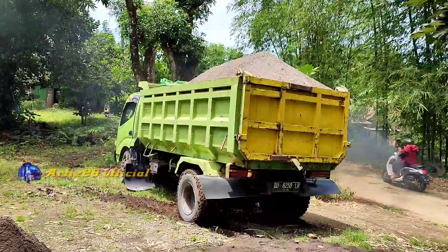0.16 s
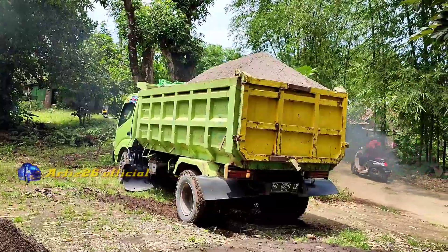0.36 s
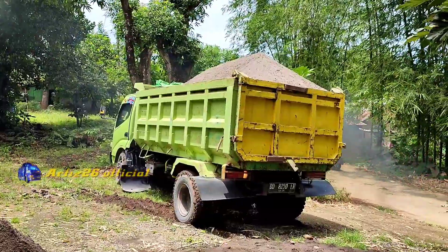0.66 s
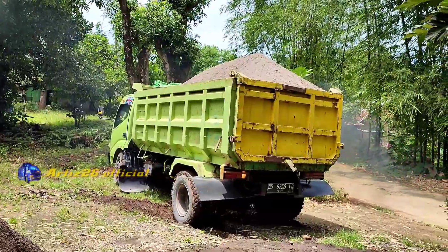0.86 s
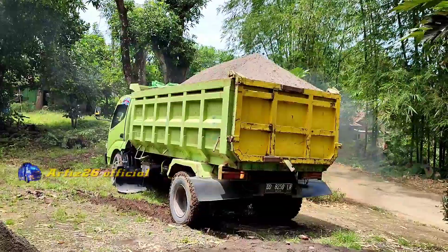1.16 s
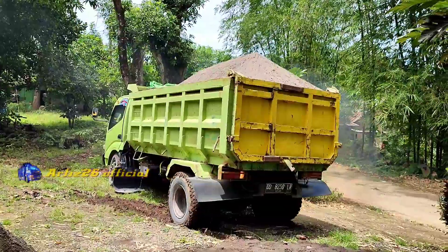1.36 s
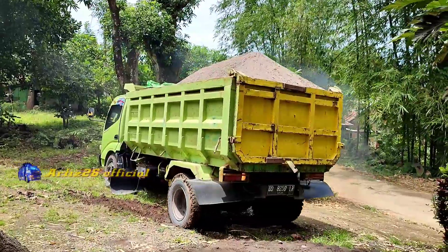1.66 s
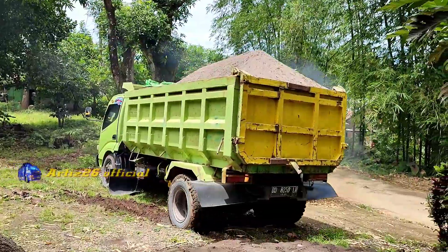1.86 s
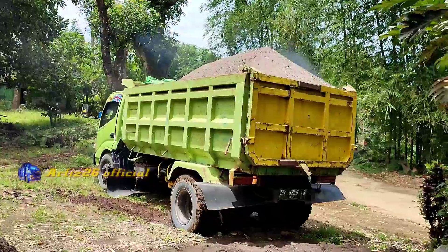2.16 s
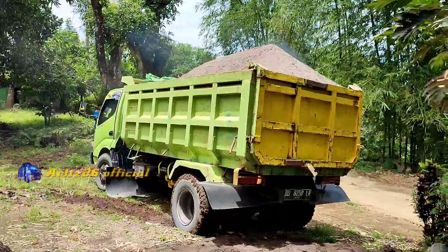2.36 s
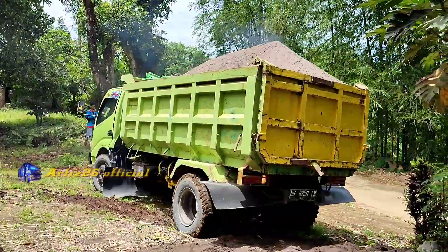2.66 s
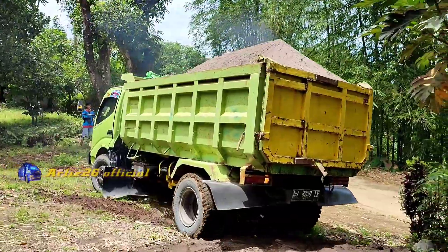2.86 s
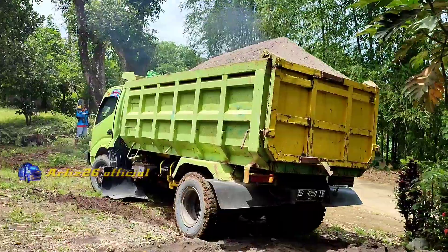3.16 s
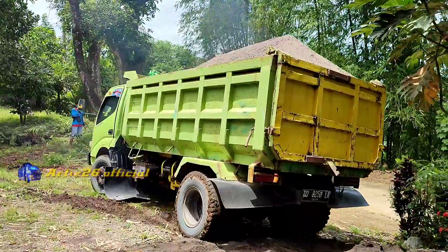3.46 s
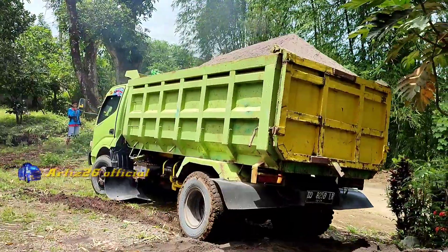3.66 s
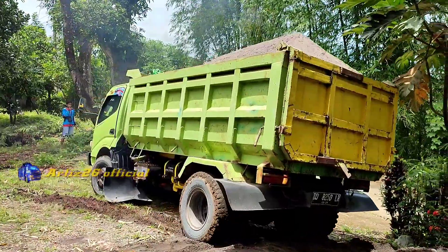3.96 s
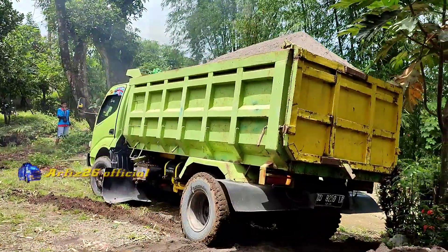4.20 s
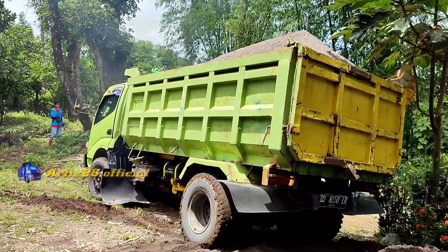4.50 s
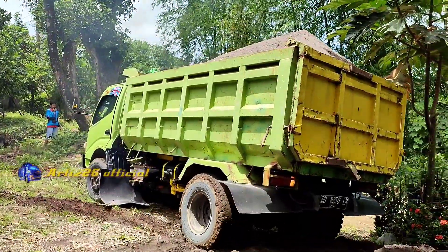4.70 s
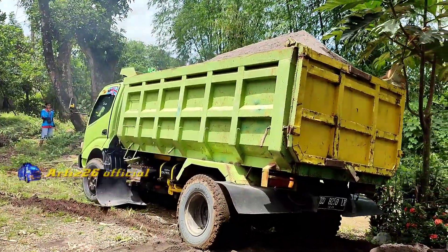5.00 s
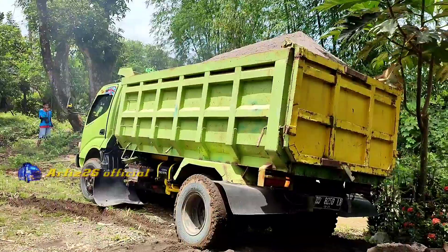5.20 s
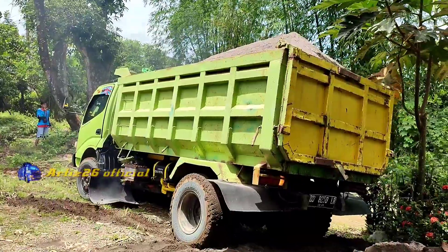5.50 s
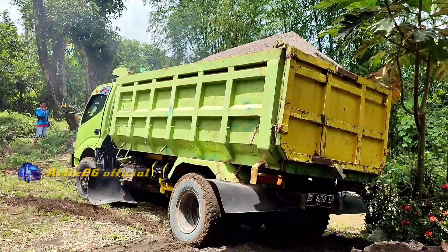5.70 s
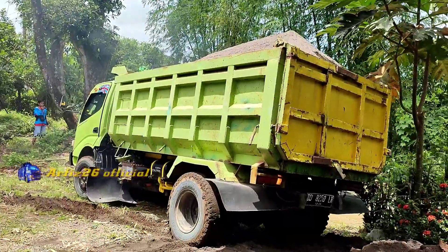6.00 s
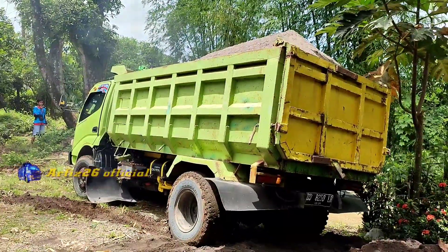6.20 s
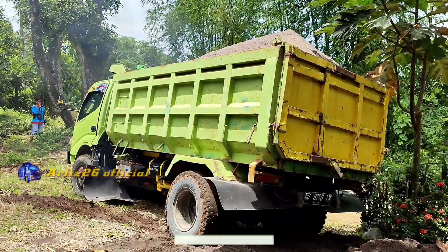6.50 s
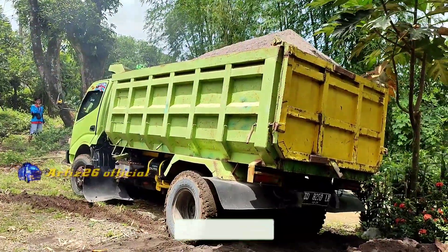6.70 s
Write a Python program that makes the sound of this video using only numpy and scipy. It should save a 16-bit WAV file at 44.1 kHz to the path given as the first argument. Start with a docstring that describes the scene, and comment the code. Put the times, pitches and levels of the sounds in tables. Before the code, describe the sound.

Deep diesel exhaust thumps, revs into a rasping, hissing roar with a faint gliding whistle, sags, pulls again, and settles into lumpy, clattering idle.

```python
"""Thumping exhaust of a loaded four-cylinder diesel dump truck, stuck in soft ground; it sinks briefly,
revs in bursts, then settles to idle. One train of firings drives it all: each rings the exhaust pipe,
knocks the block and pushes out a puff of rasping, hissing gas.
Gas flow under load whistles in the tailpipe: narrow noise bands that glide in pitch.
Stereo: noise alike in the bass and unrelated in the treble, the right side slightly ahead."""
import sys
import numpy as np
from scipy import signal
from scipy.fft import rfft, irfft, next_fast_len
from scipy.io import wavfile
from scipy.ndimage import uniform_filter1d, map_coordinates

SR = 44100
rng = np.random.default_rng(int(sys.argv[2]) if len(sys.argv) > 2 else 0)


def unload_audio(sound):
    """Save the sound as a 16-bit wav file, at the path given as the first command line argument."""
    columns = np.transpose(np.atleast_2d(sound))
    # keep every value between -1 and 1, then stretch to whole-number steps
    steps = np.round(np.clip(columns, -1, 1) * 32767)
    wavfile.write(sys.argv[1], SR, steps.astype(np.int16))


N = 302085

# engine speed: time_s [s], firing_rate_hz [firings/s]
SPEED = [(0.0, 34.29), (0.339, 32.61), (0.45, 35.64), (0.654, 53.78), (0.924, 53.65), (1.08, 60.37),
         (1.288, 65.03), (1.684, 55.08), (2.15, 54.51), (2.279, 49.46), (2.429, 38.37), (2.587, 35.62),
         (2.948, 39.56), (3.581, 41.92), (3.854, 35.39), (4.096, 31.96), (4.393, 30.83), (4.709, 32.33),
         (4.947, 36.75), (5.193, 28.35), (5.487, 22.28), (6.05, 21.07)]
# exhaust pulse spectra, hotter gas lifts the resonances: freq_hz [Hz], relative_level_db [dB]
PIPE_IDLE = [(12, -24), (22, 5), (42, 10), (63, 1.5), (85, 9.5), (108, 7.5), (130, -1.5), (165, -17),
             (240, -31.5), (400, -33), (800, -67)]
PIPE_LUG = [(15, -13), (36, -5), (62, -5), (86, 2), (115, -1), (140, -7.5), (175, 3), (202, -1),
            (250, -17.5), (300, -22), (370, -21), (480, -50), (1000, -52), (1600, -71)]
PIPE_RACE = [(20, -41), (55, -4), (95, -5), (132, -1.5), (165, 1.5), (198, 6), (225, -1.5), (272, -14.5),
             (335, -13.5), (400, -18.5), (490, -32.5), (700, -26.5), (1050, -49.5), (1700, -61)]
# speeds of the pipe states: idle_hz, lug_from_hz, lug_to_hz, race_hz [firings/s]
PIPE_SPEEDS_HZ = [23.493, 32.3, 40.5, 56.4]
# unequal firing strength, one entry per cylinder: strength_db [dB]
CYLINDERS_DB = [0.018, -0.23, 0.023, 0.11]
# noise spectra: freq_hz [Hz], relative_density_db [dB per Hz]
RASP = [(300, -12), (450, -3), (530, -4.5), (600, -2.5), (700, 2), (950, 3), (1150, -10), (1800, -12.5),
        (4000, -56)]
CLATTER = [(300, -13), (700, -8.5), (1200, -1.5), (1700, 1), (2300, 1), (2850, -3), (3500, -7.5),
           (4300, -16), (6000, -14), (10000, -21.5)]
HISS = [(1200, -15), (2800, -2.5), (4000, 4.5), (4700, 0.5), (5700, -2), (7200, -1.5), (8200, -7.5),
        (9000, -10.5), (9900, -16), (12500, -17.5), (14300, -23)]
BLARE = [(180, -21.5), (255, -6.5), (320, 0), (385, 0), (460, -12.5), (560, -14.5), (900, -56)]
RUMBLE = [(15, -35), (35, -26), (90, 8), (200, 4.5), (260, -3.5), (500, -76)]
# left-right likeness of the noise: freq_hz [Hz], correlation [-1 to 1]
ALIKE = [(150, 1), (350, 0.91), (600, 0.48), (1000, 0.42), (2000, 0.19), (5000, 0.11), (12000, -0.043)]
# stereo balance: freq_hz [Hz], left_minus_right_db [dB]
BALANCE = [(100, 0.52), (430, 0.2), (650, -2), (1000, 0), (1350, -3.5), (2400, -2), (2900, -1), (4100, -5),
           (5800, -2), (7000, -2.5), (7900, -6.5), (8600, 6.5), (9600, -1.5), (14000, .3)]
# engine block resonances: freq_hz [Hz], width_hz [Hz], lift_db [dB]
BLOCK = [(704, 70, 10.5), (990, 90, 1), (1238, 33, 4), (1498, 54, 6.5), (1940, 51, 5.5), (2127, 49, 6.5),
         (2353, 61, 4), (2850, 25, 6.5)]
# engine load: time_s [s], load_db [dB re full load]
LOAD = [(0.05, -11), (0.24, -14.5), (0.49, -7), (0.57, 2.5), (0.68, 0.5), (0.98, -2.5), (1.43, -0.5),
        (1.57, 2), (2.17, 0), (2.43, -7.5), (2.62, -3.5), (3.25, -0.5), (3.5, 1.5), (3.8, -5), (4.2, -10),
        (4.76, -8.5), (4.94, -3.5), (5.04, -10), (5.36, -17.5), (6.85, -16)]
# tailpipe gas flow: time_s [s], flow_db [dB re full flow]
FLOW = [(0.0, -1.5), (0.05, -8.5), (0.14, -17.5), (0.47, -15), (0.58, -5.5), (0.93, -12), (1.14, -2.5),
        (1.5, -0.5), (2.13, -1.5), (2.48, -11.5), (2.82, -5), (3.1, -6), (3.56, -2), (3.78, -11.5),
        (4.4, -7.5), (4.94, -3), (5.09, -14), (5.35, -19.5), (6.85, -21)]
# driver lifts off the pedal: start_s [s], end_s [s], stumble_db [dB of load lost as fuel is cut]
LIFTS = [(0.12, 0.453, -1.5), (0.694, 0.81, 6), (0.849, 0.968, 8), (2.19, 2.55, 0.5), (4.994, 5.42, 3)]
# how each part follows the engine: full_db [dB at full load, flow and speed], per_load [dB/dB],
# per_flow [dB/dB], per_octave_db [dB per doubling of speed], lifted_db [dB with the pedal lifted]
THUMP_LAW = (-14.5, 1, 0, 0, -3.5)
BARK_LAW = (-10, 0.93, 0.87, 8.5, -14)
BLARE_LAW = (-31.5, .5, 0.51, 3.5, -3)
RASP_LAW = (-36, 0.33, 0.46, 2, -.5)
CLATTER_LAW = (-35, 0.09, 0.33, 2.04, 0.5)
HISS_LAW = (-32.5, 0, 1, 0, -.5)
# labouring at high speed, the blare hardens: start_s [s], end_s [s], swell_s [s], lift_db [dB]
LABOUR = (1.69, 2.23, 0.18, 5.4)
# tailpipe whistles, one per pull: start_s [s], attack_s [s], fade_s [s, fade begins], end_s [s],
# level_db [dB], first_hz [Hz], settled_hz [Hz], glide_s [s, time constant]
WHISTLES = [(0.47, 0.11, 0.55, 0.9, -34, 3090, 3300, .25), (0.94, 0.27, 1.54, 2.44, -28, 3020, 3793, .28),
            (2.5, 0.13, 3.603, 3.88, -29, 3183, 3470, .75),
            (3.78, 0.21, 4.68, 5.15, -29.5, 3380, 3182, .28)]

TOP_HZ = 14300
LEFT_LAG_S = .00008
FULL_SPEED_HZ = 51.4  # firings/s
PEDAL_S, STUMBLE_DELAY_S, STUMBLE_S = 0.038, 0.014, 0.015  # pedal travel; stumble delay, half length
BARK_TOP_DB, BARK_TOP_DB_PER_OCTAVE = -17.5, 8  # bark cap at top of lugging; its rise per speed doubling
HUNT_DB, HUNT_LIFTED_DB, HUNT_KNOTS_HZ = .4, 1.3, 22  # random swell; extra with pedal lifted; rate
CLEAR_LUG, CLEAR_RACE, CLEAR_LABOUR = 0.22, 0.43, .42  # tonal power share of blare; last is added


def amp(db):
    """Decibels to gain."""
    return 10 ** (np.asarray(db) / 20)


def unit(x):
    """Scale to rms 1."""
    return x / np.sqrt(np.mean(x ** 2) + 1e-20)


def along(points, hz):
    """Read (Hz, value) points on a log frequency axis."""
    f, v = np.transpose(points)
    return np.interp(np.log(hz + 1), np.log(f + 1), v)


def curve(rows):
    """Interpolate (s, value) rows to one value per sample."""
    s, v = np.transpose(rows)
    return np.interp(np.arange(N) / SR, s, v)


def wobble(knots_hz):
    """A smooth random curve through knots at a given rate."""
    knots = rng.standard_normal(int(N * knots_hz / SR) + 4)
    return map_coordinates(knots, [np.arange(N) * knots_hz / SR])


def filtered(x, response):
    """Multiply the spectrum of x by a response of frequency."""
    m = next_fast_len(N + SR // 2)
    return irfft(rfft(x, m) * response(np.fft.rfftfreq(m, 1 / SR)), m)[..., :N]


def below(x, edge_hz, order=24):
    """The part of x under an edge."""
    return filtered(x, lambda hz: 1 / (1 + (hz / edge_hz) ** order))


def steady(x, size=4096):
    """Hold the slow level of x at rms 1."""
    power = uniform_filter1d(uniform_filter1d(x ** 2, size), size)
    return x / np.sqrt(np.abs(power) + 1e-20)


def ringing(spectrum, size=16384):
    """Minimum-phase impulse response of a spectrum, by folding its cepstrum."""
    log_gain = np.log(amp(along(spectrum, np.fft.rfftfreq(size, 1 / SR))))
    cepstrum = irfft(log_gain)
    cepstrum[1:size // 2] *= 2
    cepstrum[size // 2 + 1:] = 0
    return irfft(np.exp(rfft(cepstrum)))[:size // 2]


def rush(spectrum, modes=()):
    """Turbulent stereo noise, mid at rms 1; the mid-side split sets its left-right correlation."""
    def colour(hz):
        lift_db = sum(db / (1 + (2 * (hz - f) / width_hz) ** 2) for f, width_hz, db in modes)
        return amp(along(spectrum, hz) + lift_db)

    def mid_side(hz):
        angle = np.arccos(np.clip(along(ALIKE, hz), -1, 1)) / 2
        return colour(hz) * [np.cos(angle), np.sin(angle)]

    mid, side = filtered(rng.standard_normal((2, N)), mid_side)
    return np.array([mid + side, mid - side]) / np.std(mid)


def held(start_s, end_s, ramp_s):
    """1 between two times, 0 outside, with a ramp centred on each edge."""
    t = np.arange(N) / SR
    return np.clip(np.minimum(t - start_s, end_s - t) / ramp_s + .5, 0, 1)


def lifted():
    """1 while the pedal is lifted, 0 while it is pressed."""
    return sum(held(start_s, end_s, PEDAL_S) for start_s, end_s, _ in LIFTS)


def hunting():
    """Random swell and sag of the pulses in dB, most with the pedal lifted."""
    return (HUNT_DB + HUNT_LIFTED_DB * lifted()) * wobble(HUNT_KNOTS_HZ)


def level(law):
    """Level in dB of one part of the sound, from load, gas flow, speed and pedal."""
    full_db, per_load, per_flow, per_octave_db, lifted_db = law
    t = np.arange(N) / SR
    stumble_db = 0
    for start_s, _, db in LIFTS:
        stumble_db = stumble_db + db * np.exp(-((t - start_s - STUMBLE_DELAY_S) / STUMBLE_S) ** 2)
    load_db = per_load * (curve(LOAD) - stumble_db)
    flow_db = per_flow * curve(FLOW)
    speed_db = per_octave_db * np.log2(curve(SPEED) / FULL_SPEED_HZ)
    return full_db + load_db + flow_db + speed_db + lifted_db * lifted()


def firings(speed_hz, jitter_s, scatter_db):
    """One impulse per firing, its size set by the cylinder and by chance, its time jittered."""
    at = np.flatnonzero(np.diff(np.floor(np.cumsum(speed_hz) / SR + .75)))
    size_chance, time_chance = rng.standard_normal((len(at), 2)).T
    size_db = np.resize(CYLINDERS_DB, len(at)) + scatter_db * size_chance
    at = np.clip(at + np.round(jitter_s * SR * time_chance).astype(int), 0, N - 1)
    return np.bincount(at, amp(size_db), N)


def puffs(fire, delay_s, rise_s, fall_s, share, scatter_db):
    """Envelope near rms 1: a power share swells after each firing, the rest is steady."""
    t = np.maximum(np.arange(SR // 8) / SR - delay_s, 0)
    shape = (1 - np.exp(-t / rise_s)) * np.exp(-t / fall_s)
    scattered = fire * amp(scatter_db * rng.standard_normal(N))
    power = signal.fftconvolve(scattered ** 2, shape ** 2)[:N]
    pulsed = steady(np.sqrt(np.abs(power)), size=8192)
    share = np.clip(share, 0, 1)
    return np.sqrt(1 - share + share * pulsed ** 2)


def exhaust(fire, speed_hz):
    """Firings ring the pipe; more fuel steepens each pulse, so that it barks and then blares."""
    start_s, end_s, swell_s, labour_db = LABOUR
    labour = held(start_s, end_s, swell_s)
    idle = np.interp(speed_hz, PIPE_SPEEDS_HZ[:2], [1, 0])
    race = np.interp(speed_hz, PIPE_SPEEDS_HZ[2:], [0, 1])
    states = [(idle, PIPE_IDLE), (1 - idle - race, PIPE_LUG), (race, PIPE_RACE)]
    pipe = sum(signal.fftconvolve(fire * weight, ringing(spectrum))[:N] for weight, spectrum in states)
    thump, body = below(pipe, 145), below(pipe, 255)

    thump_db = level(THUMP_LAW) + hunting()
    octaves = np.log2(speed_hz / PIPE_SPEEDS_HZ[2])
    bark_db = np.minimum(level(BARK_LAW), BARK_TOP_DB + BARK_TOP_DB_PER_OCTAVE * octaves) + hunting()
    pulses = amp(thump_db) * steady(thump) + amp(bark_db) * steady(body - thump)

    # clear tone when labouring, ragged chuff at low speed
    clear = np.clip(CLEAR_LUG * (1 - race) + CLEAR_RACE * race + CLEAR_LABOUR * labour, 0, 1)
    chuff = rush(BLARE) * puffs(fire, delay_s=.001, rise_s=.002, fall_s=.014, share=.45, scatter_db=1)
    mix = np.sqrt(clear) * steady(pipe - body) + np.sqrt(1 - clear) * chuff
    blare = amp(level(BLARE_LAW) + labour_db * labour) * mix

    # uneven combustion fills between harmonics; relative to the thump, most at low speed and coasting
    rumble = amp(thump_db - 13.5 - 4.5 * race + 3.2 * lifted()) * rush(RUMBLE)
    return pulses + blare + rumble


def gas(fire):
    """Each puff leaves the pipe as turbulence: a mid-band rasp and a treble hiss."""
    rasp_puffs = puffs(fire, delay_s=.003, rise_s=.0022, fall_s=.015, share=.4, scatter_db=2)
    hiss_puffs = puffs(fire, delay_s=.0028, rise_s=.0024, fall_s=.013, share=.23, scatter_db=9)
    rasp = amp(level(RASP_LAW)) * rush(RASP) * rasp_puffs
    hiss = amp(level(HISS_LAW)) * rush(HISS) * hiss_puffs
    return rasp + hiss


def clatter(fire, speed_hz):
    """Diesel knock rings the block at each firing; valve gear ticks as a fast random flicker."""
    distinct = np.interp(speed_hz, [22, 45], [.42, .3])  # knocks run together at speed
    knock = puffs(fire, delay_s=.005, rise_s=.002, fall_s=.02, share=distinct, scatter_db=1.2)
    ticking = unit(amp(1.34 * wobble(330)))
    return amp(level(CLATTER_LAW)) * rush(CLATTER, BLOCK) * knock * ticking


def whistle(fire, width_hz, skirt_hz):
    """Tailpipe flow tone: narrow noise gliding to a settled pitch in each pull, fluttering with puffs."""
    def band(hz):
        return 1 / np.sqrt((1 + (hz / width_hz) ** 2) * (1 + (hz / skirt_hz) ** 4))

    t = np.arange(N) / SR
    in_phase, quadrature = filtered(rng.standard_normal((2, 2, N)), band)
    tone = np.zeros((2, N))
    for start_s, attack_s, fade_s, end_s, level_db, first_hz, settled_hz, glide_s in WHISTLES:
        glide = np.exp(-np.maximum(t - start_s, 0) / glide_s)
        pitch_hz = settled_hz + (first_hz - settled_hz) * glide
        phase = 2 * np.pi * np.cumsum(pitch_hz) / SR
        attack, fade = (t - start_s) / attack_s, (end_s - t) / (end_s - fade_s)
        envelope = np.clip(np.minimum(attack, fade), 0, 1)
        carrier = unit(in_phase * np.cos(phase) + quadrature * np.sin(phase))
        tone += amp(level_db) * envelope * carrier
    return tone * puffs(fire, delay_s=.006, rise_s=.008, fall_s=.011, share=.45, scatter_db=1.2)


def placed(x):
    """Tilt the left-right balance by frequency and delay the left against the right."""
    sides = np.array([[.5], [-.5]])

    def response(hz):
        delay = np.exp(-2j * np.pi * hz * sides * LEFT_LAG_S)
        return amp(sides * along(BALANCE, hz)) * delay

    return filtered(x, response)


def scene():
    """One train of firings drives every part of the engine's sound."""
    speed_hz = curve(SPEED)
    fire = firings(speed_hz, jitter_s=.00006, scatter_db=1.14)
    truck = exhaust(fire, speed_hz) + gas(fire) + clatter(fire, speed_hz)
    truck = truck + whistle(fire, width_hz=54, skirt_hz=288)
    return placed(truck)


def record(dry, low_cut_hz=20, ceiling=0.97, order=8):
    """Cut the deepest bass, round the tallest peaks, drop everything above the band limit."""
    x = signal.sosfilt(signal.butter(2, low_cut_hz, "high", fs=SR, output="sos"), dry)
    x = x / (1 + np.abs(x / ceiling) ** order) ** (1 / order)
    return filtered(x, lambda hz: hz < TOP_HZ)


dry = scene()
out = record(dry)
unload_audio(out)
```